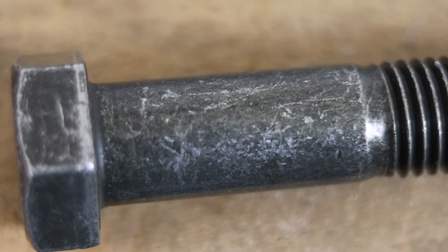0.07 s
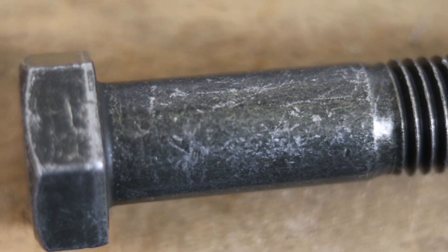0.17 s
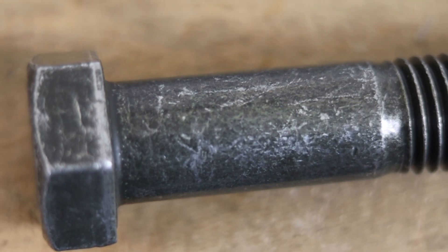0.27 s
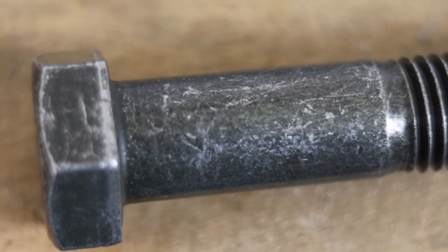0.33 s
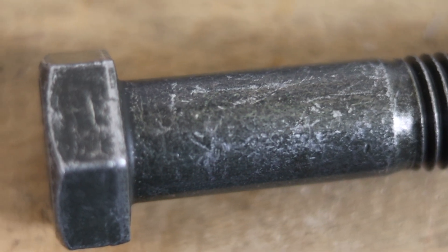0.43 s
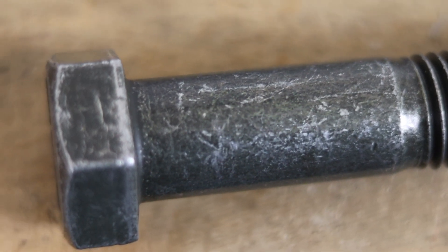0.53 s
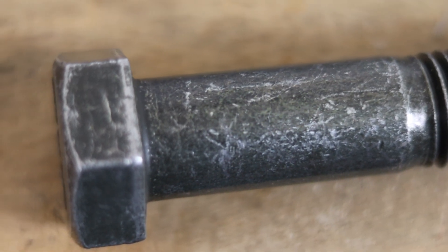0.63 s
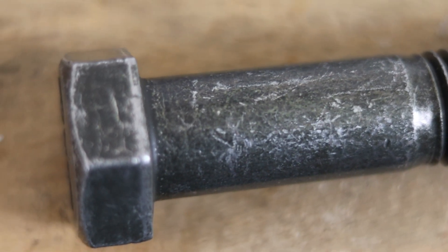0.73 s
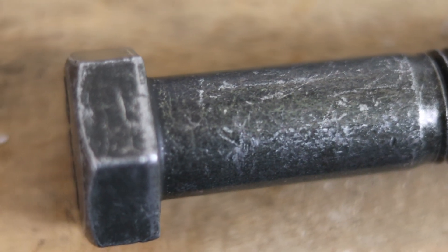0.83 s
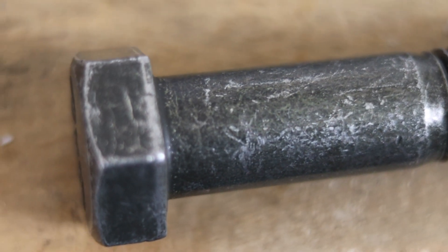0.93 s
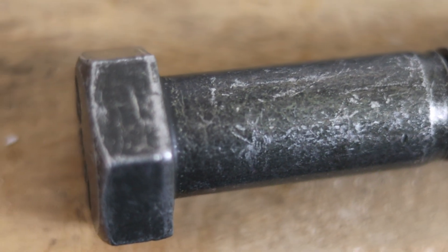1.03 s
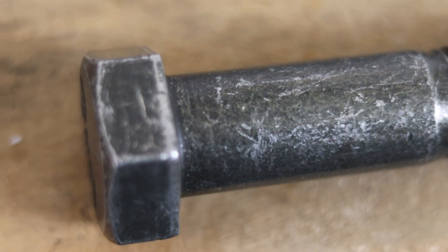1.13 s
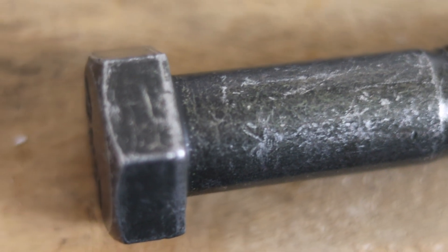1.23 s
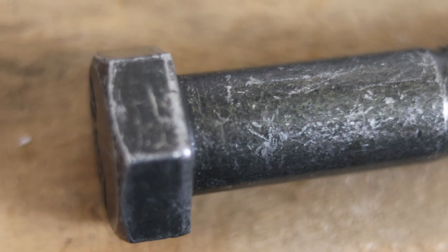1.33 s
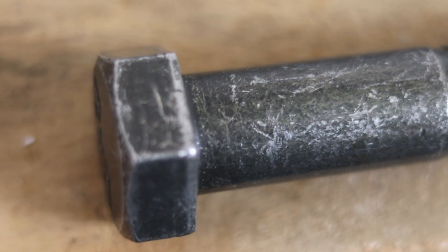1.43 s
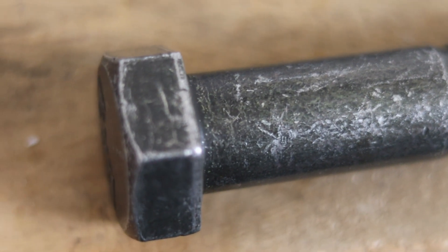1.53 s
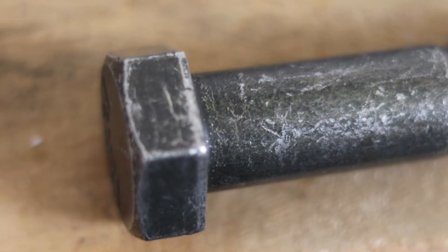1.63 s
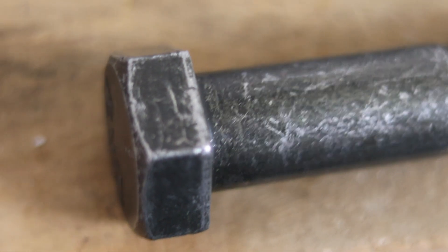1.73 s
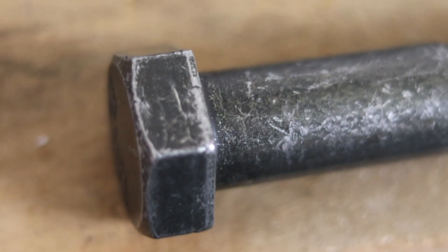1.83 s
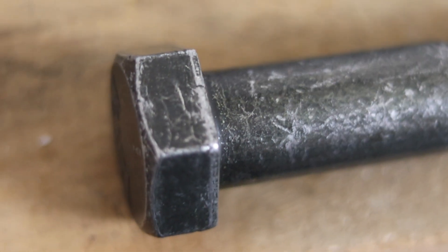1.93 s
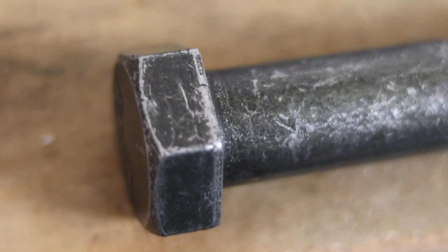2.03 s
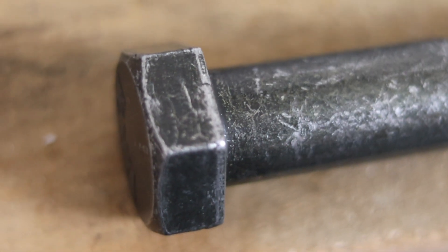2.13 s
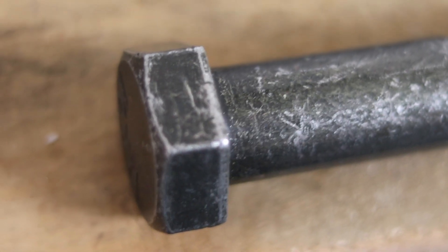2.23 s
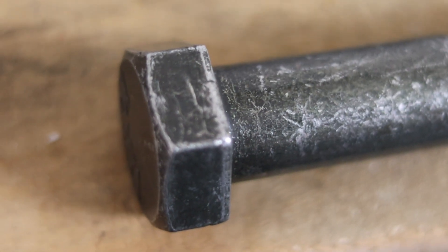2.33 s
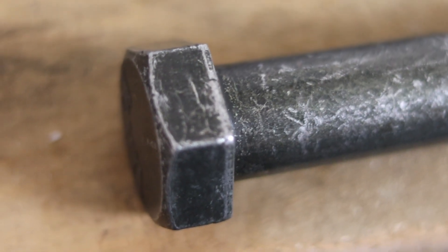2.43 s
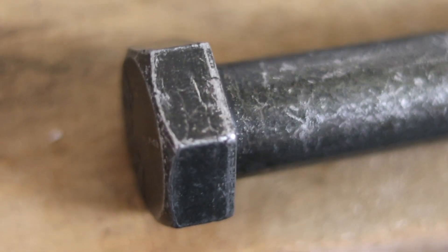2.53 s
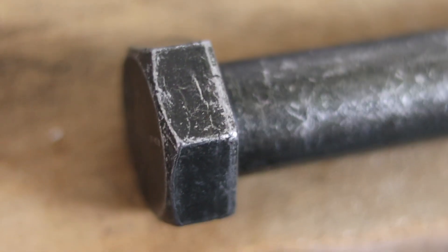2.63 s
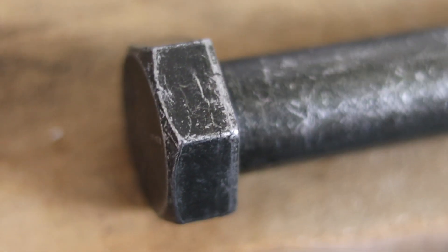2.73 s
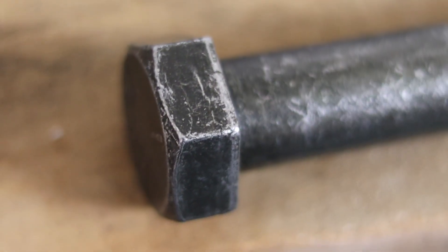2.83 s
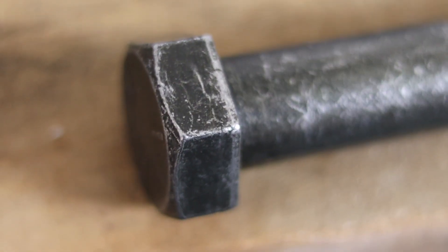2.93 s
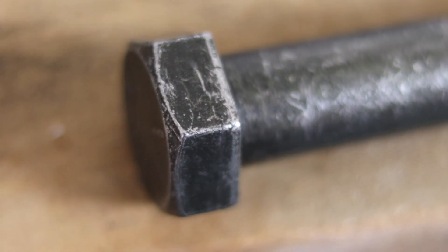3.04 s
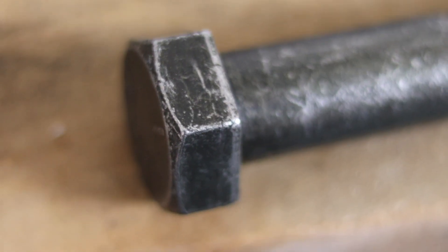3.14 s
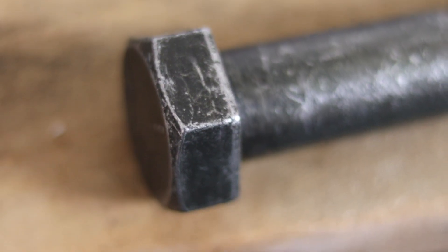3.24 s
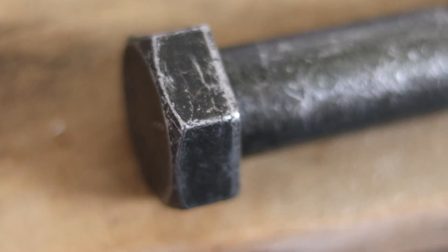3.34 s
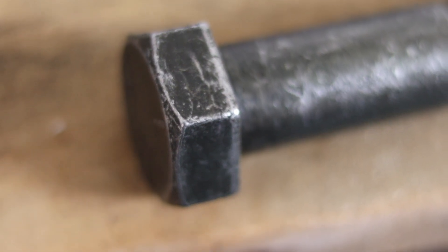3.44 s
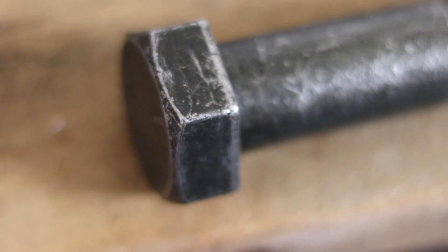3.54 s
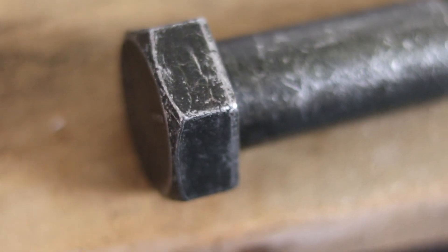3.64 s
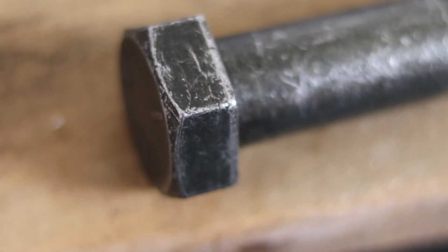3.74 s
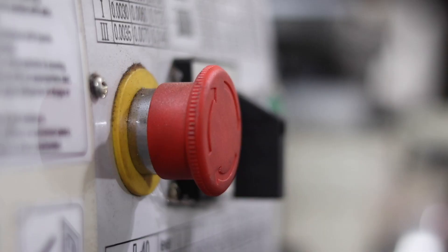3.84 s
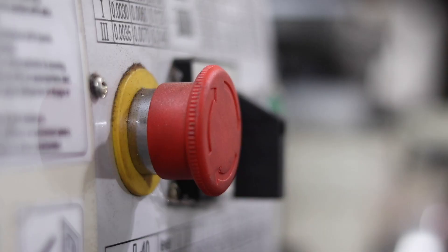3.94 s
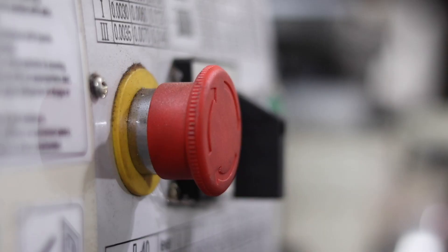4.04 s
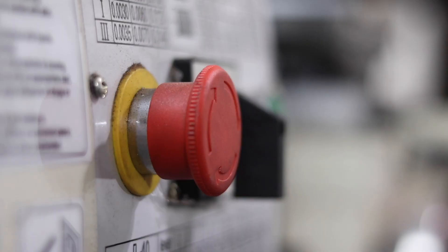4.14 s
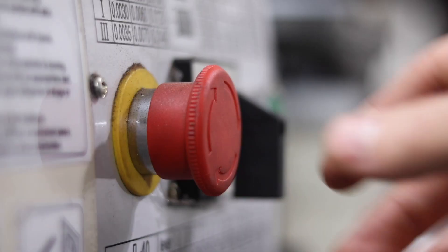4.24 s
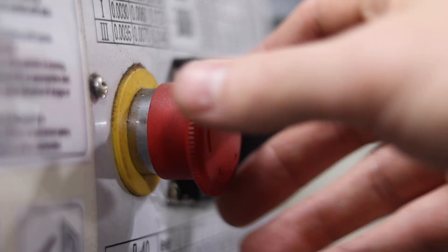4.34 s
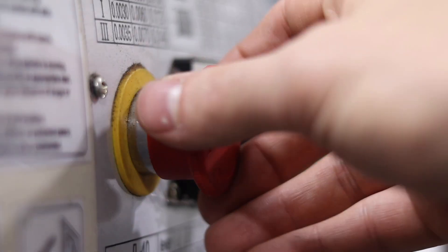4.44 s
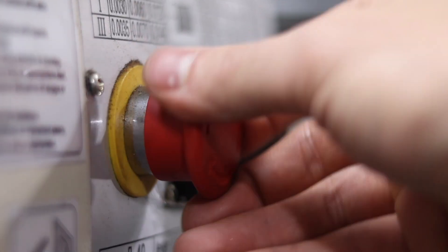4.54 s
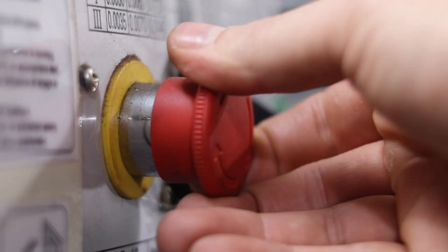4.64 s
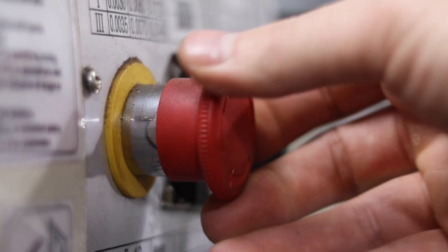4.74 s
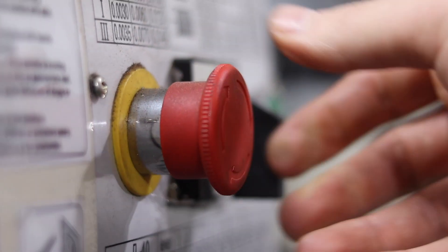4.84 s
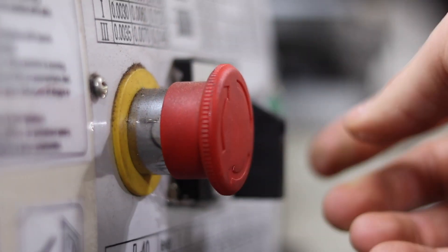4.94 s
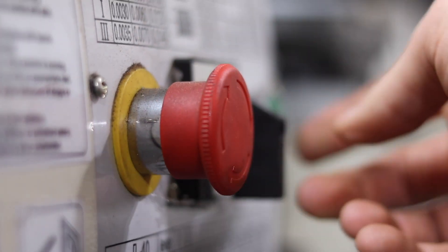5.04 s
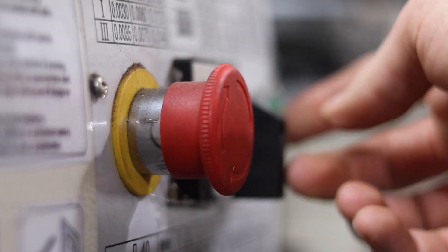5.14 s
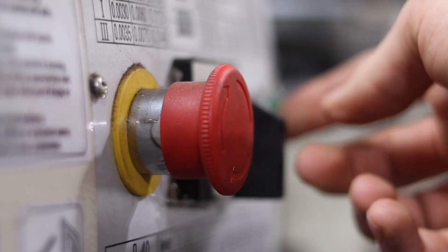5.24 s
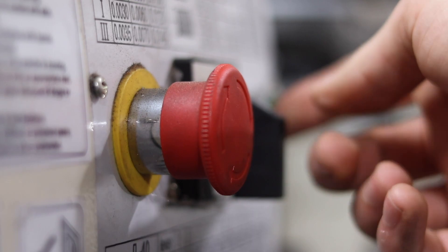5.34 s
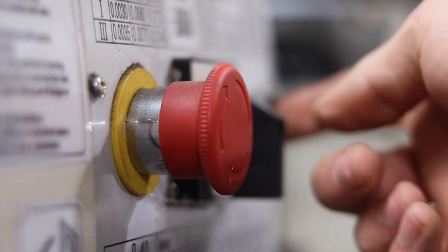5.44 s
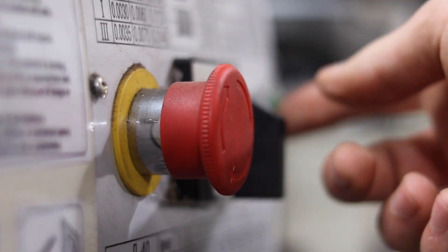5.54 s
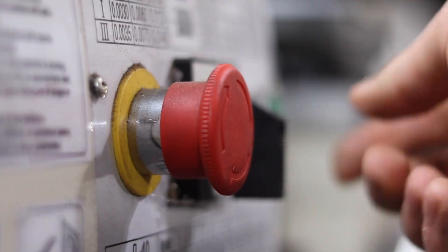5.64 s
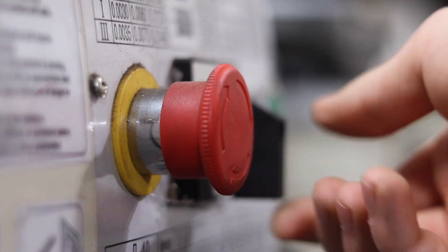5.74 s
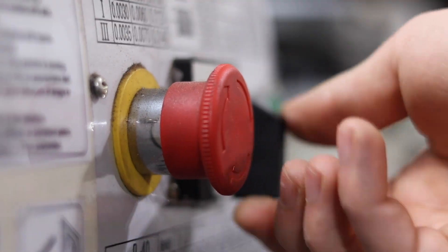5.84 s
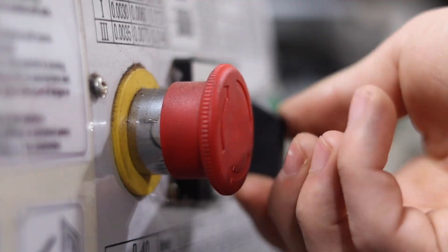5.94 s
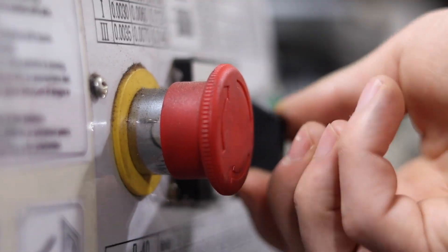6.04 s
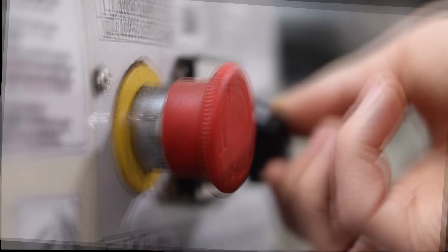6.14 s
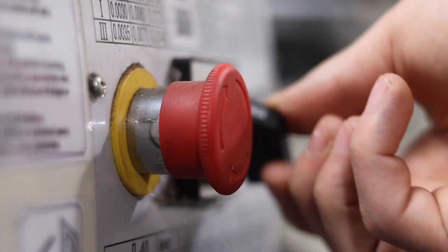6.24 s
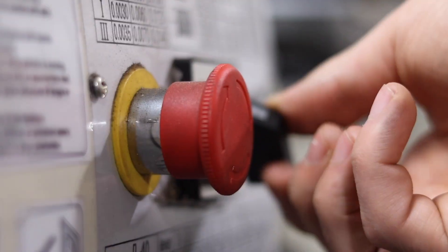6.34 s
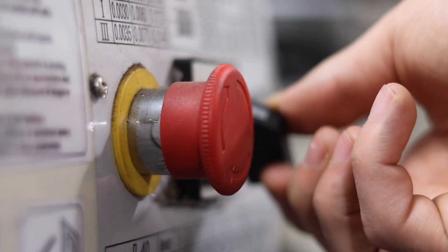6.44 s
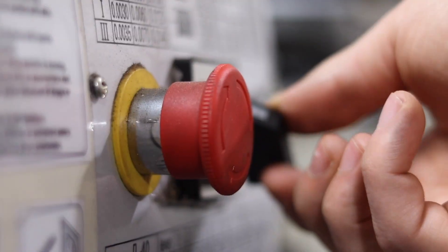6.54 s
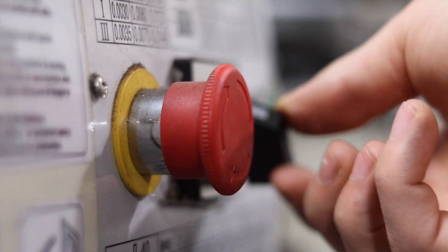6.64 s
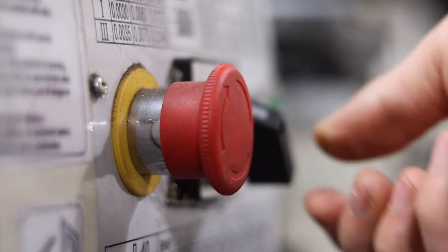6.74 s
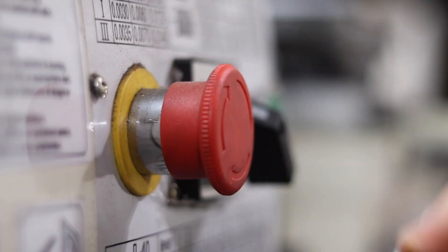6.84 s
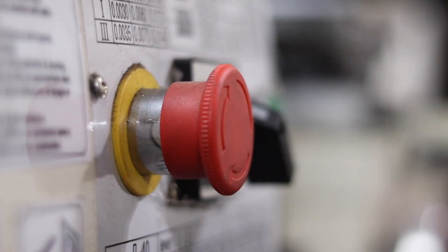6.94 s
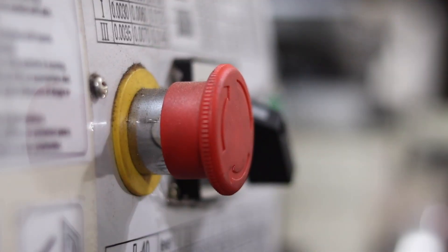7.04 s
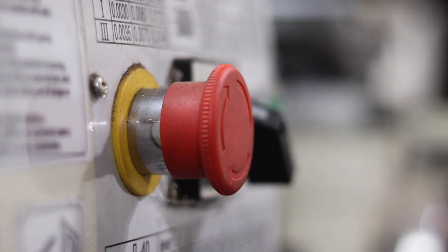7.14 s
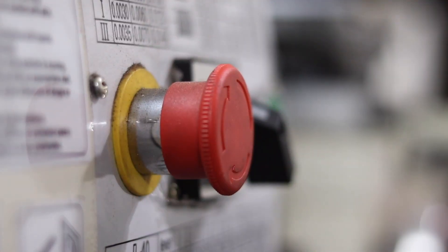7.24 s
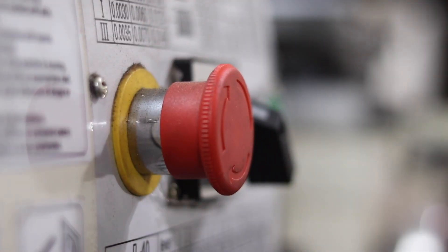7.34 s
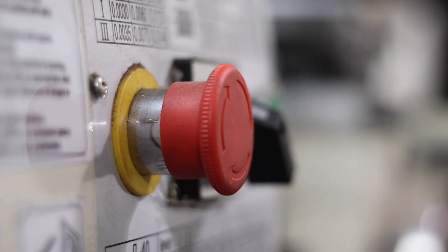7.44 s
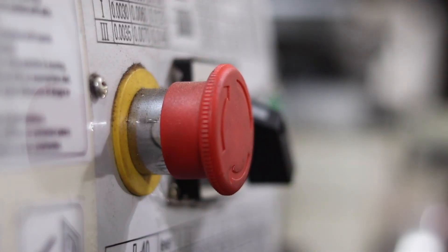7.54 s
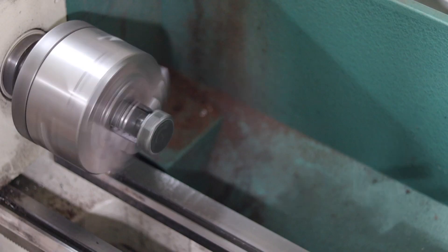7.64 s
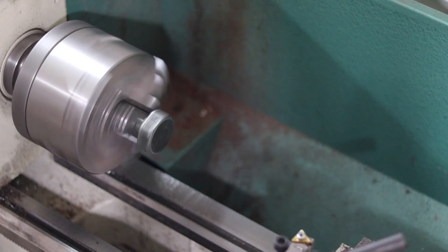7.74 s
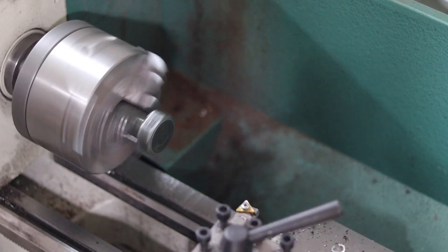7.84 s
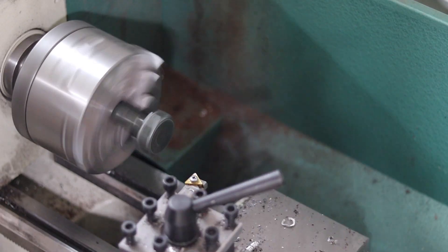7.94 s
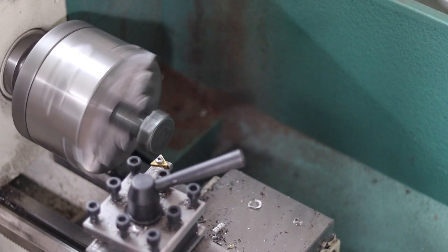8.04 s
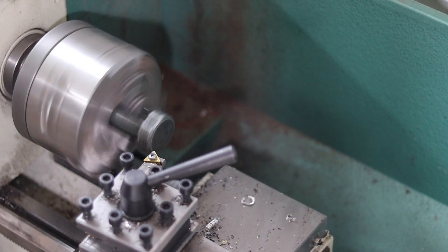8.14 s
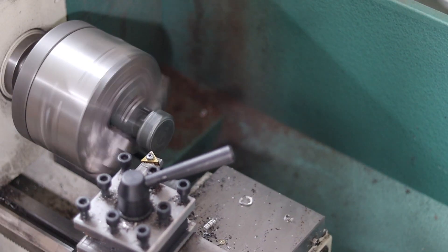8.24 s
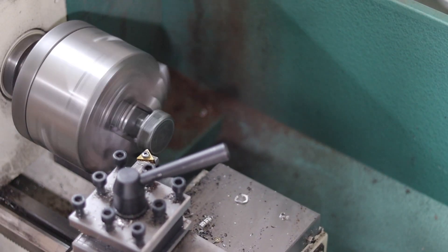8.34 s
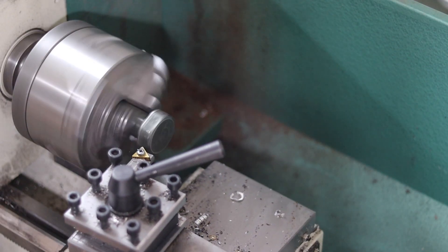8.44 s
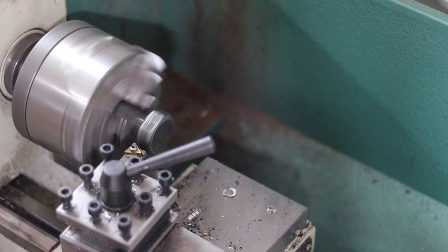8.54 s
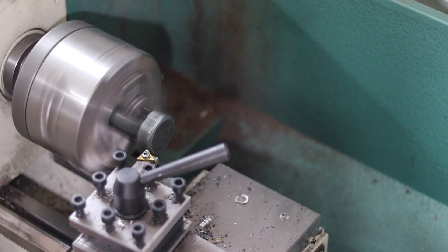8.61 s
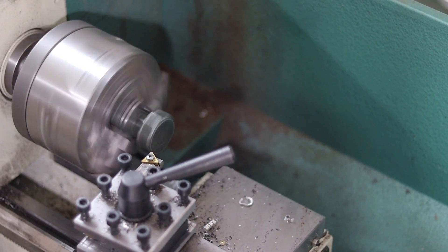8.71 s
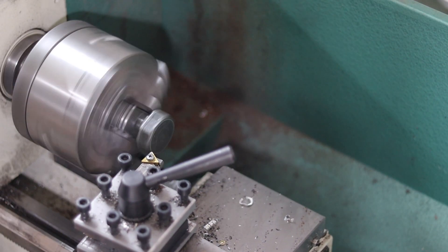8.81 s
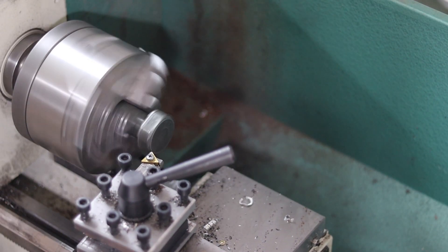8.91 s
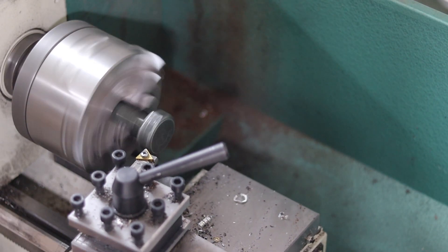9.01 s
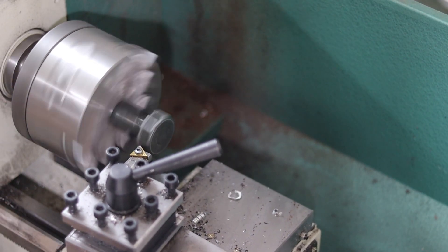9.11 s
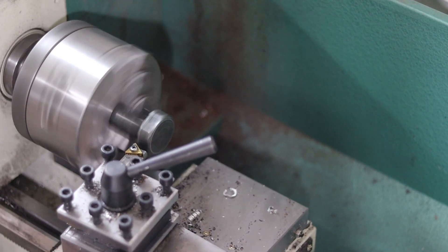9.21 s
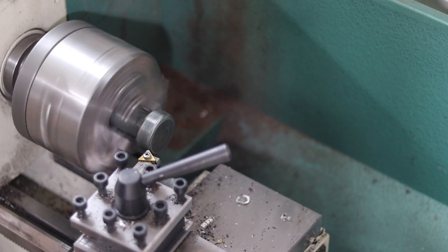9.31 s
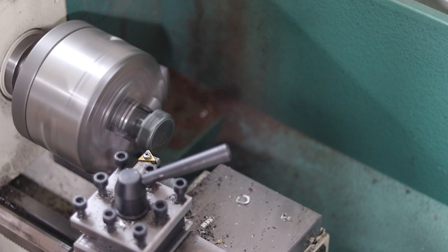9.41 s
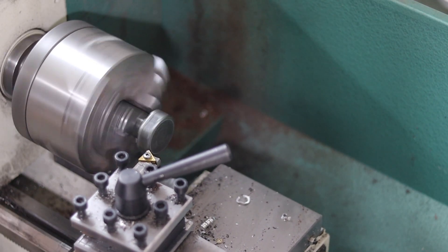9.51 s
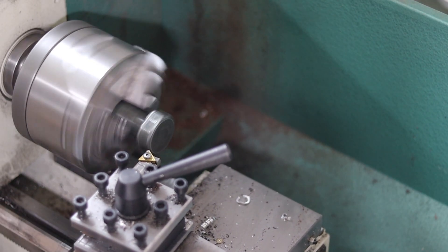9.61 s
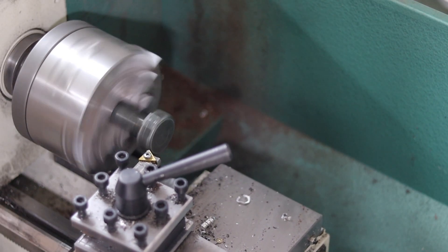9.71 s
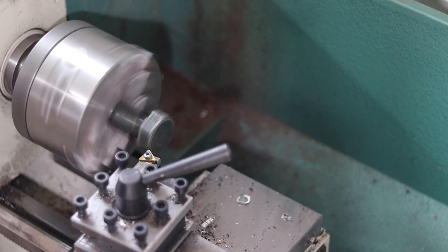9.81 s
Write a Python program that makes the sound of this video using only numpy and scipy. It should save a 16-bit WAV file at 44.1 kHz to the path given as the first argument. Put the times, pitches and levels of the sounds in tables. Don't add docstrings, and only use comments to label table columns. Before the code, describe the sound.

Low workshop hum with faint ticks drops to near silence, then a stop button clicks, a contactor clacks, and a lathe spins up to a steady whine.

```python
import sys
import numpy as np
from scipy import signal
from scipy.fft import rfft, irfft, next_fast_len
from scipy.io import wavfile
from scipy.ndimage import uniform_filter1d

SR = 44100
rng = np.random.default_rng(int(sys.argv[2]) if len(sys.argv) > 2 else 0)


def to_wav(s):
    ch = np.atleast_2d(s).T
    pcm = np.round(np.clip(ch, -1, 1) * 32767)
    wavfile.write(sys.argv[1], SR, pcm.astype(np.int16))


def field_ratio(decibels):
    return 10 ** (np.asarray(decibels, dtype=float) / 20)


N = 435282
T = np.arange(N) / SR

HUM_END_S, START_S, FAR_S = 3.876, 6.2, 7.642
TEETH = 48
TURN_HZ = 357.9 / TEETH
MAINS_HUM_HZ = 120.0

# cycles per spindle turn, level/dB
GEAR_ORDERS = [(44, -41.0), (47, -40.0), (48, -18.0), (49, -35.0), (87, -39.0), (90, -31.0), (91, -31.0),
               (92, -33.0), (93, -36.0), (94, -34.0), (95, -37.0), (96, -24.0), (97, -36.0), (99, -34.0),
               (100, -35.0), (101, -37.0), (103, -38.0), (104, -41.0), (105, -40.0), (144, -42.0),
               (145, -48.0), (148, -51.0), (190, -52.0), (191, -53.0), (192, -52.0), (193, -50.0),
               (196, -51.0), (197, -50.0), (200, -54.0), (240, -54.0)]
# f/Hz, width/Hz, level/dB
HEADSTOCK_PEAKS = [(696, 72, 0.5), (1110, 9.1, -30), (1328, 16, -14.5), (1770, 94, -30), (2156, 36, -14),
                   (2826, 9.9, -10.5), (3330, 65, -26), (3980, 27, -29)]
# f/Hz, level/dB
PLASTIC_COLOUR = [(250, -41.5), (700, -4.5), (1250, -4), (1800, 0), (2400, -9.5), (3600, -8), (5000, -15.5),
                  (7000, -32), (12000, -54)]
# f/Hz, level/dB, time to fall 60 dB/s
PANEL_MODES = [(920, -22, .15), (1308, -14, .12), (1567, -9, .12), (1760, -10, .12), (2116, -17, .1),
               (3435, -10, .08)]
# f/Hz, width/Hz, level/dB
CABINET_THUD = [(198, 46, 22.9), (399, 430, 9.7)]


def level(x, db):
    return x * field_ratio(db) / np.sqrt(np.mean(x ** 2))


def read(table, hz):
    table_hz, values = np.array(table)[:, 0], np.array(table)[:, 1]
    return np.interp(np.log(hz + 1), np.log(table_hz + 1), values)


def colour(x, table):
    size = next_fast_len(len(x))
    gain = field_ratio(read(table, np.fft.rfftfreq(size, 1 / SR)))
    return irfft(rfft(x, size) * gain, size)[:len(x)]


def resonate(x, peaks):
    return sum(field_ratio(db) * signal.lfilter(*signal.iirpeak(hz, hz / width, SR), x) for hz, width, db in peaks)


def ring(x, modes):
    out = 0
    for hz, db, t60 in modes:
        pole = np.exp((2j * np.pi * hz - np.log(1000) / t60) / SR)
        out = out + field_ratio(db) * signal.lfilter([1], [1, -pole], x).imag
    return out


def noise():
    return rng.standard_normal(N)


def walk(rate):
    hold = int(SR / rate)
    steps = np.repeat(rng.standard_normal(N // hold + 1), hold)
    return uniform_filter1d(uniform_filter1d(steps, hold), hold)[:N]


def between(t0, t1):
    return np.clip(np.minimum(T - t0, t1 - T) / .004 + .5, 0, 1)


def after(s, fall_s):
    return (T >= s) * np.exp(-np.maximum(T - s, 0) / fall_s)


def room(x):
    # f/Hz, time to fall 60 dB/s
    echo_times = [(150, 1), (600, 0.54), (1800, 0.18), (4000, 0.4), (9000, 0.069), (14000, 0.21)]
    t = T[:SR]
    tail = np.zeros(SR)
    for hz in 125 * 2. ** np.arange(0, 7.1, .5):
        band = signal.lfilter(*signal.iirpeak(hz, 1.4, SR), rng.standard_normal(SR))
        tail += band * field_ratio(-60 * t / read(echo_times, hz))
    tail *= np.clip(t / 0.0094, 0, 1)
    return signal.fftconvolve(x, tail / np.linalg.norm(tail))[:len(x)]


def widen(x, side_table, smear_ms):
    age = T[:int(.005 * smear_ms * SR)]
    smear = rng.standard_normal(SR)[:len(age)] * np.exp(-age * 1000 / smear_ms)
    smeared = signal.fftconvolve(x, smear / np.linalg.norm(smear))[:N]
    side = colour(smeared, side_table)
    return np.array([x + side, x - side])


def knocks(events, body, modes, ring_db, wet_db, low_body, thud_db):
    dull, crack, thud = np.zeros(N), np.zeros(N), np.zeros(N)
    grit = noise()
    for s, db, treble_db, hz, ms in events:
        span = slice(int(s * SR), min(int(s * SR) + SR // 4, N))
        age, length = T[span] - T[span][0], max(ms, .3) / 1000
        attack = np.clip(age / (0.081 * length), 0, 1)
        burst = grit[span] * np.exp(-age / length) * attack * field_ratio(db)
        dull[span] += burst + resonate(burst, [(hz, .3 * hz, 8)])
        crack[span] += burst * field_ratio(treble_db + 5.5) * np.exp(-age / 0.0092)
        thud[span] += burst * field_ratio(thud_db + 5 * np.log2(100 * length))
    busy = slice(int(events[0][0] * SR) - SR // 10, int(events[-1][0] * SR) + SR)
    dry = field_ratio(8.5) * colour(dull[busy], body)
    dry += resonate(crack[busy], [(4700, 2200, -1.5), (8100, 4500, -0.33), (12600, 1400, 0)])
    dry += field_ratio(ring_db) * ring(dull[busy], modes)
    dry += resonate(resonate(thud[busy], low_body), [(298, 1200, 0.0058)])
    out = np.zeros(N)
    out[busy] = dry + field_ratio(wet_db) * room(dry)
    return out


def stop_button():
    # t/s, peak level/dB, treble against it/dB, main f/Hz, rattle length/ms
    button_knocks = [
        (4.384, -48, -8.5, 2800, 35),
        (4.438, -47, -25.5, 1000, 6.1),
        (4.57, -41, -20, 1610, 17),
        (4.592, -34.5, -11, 1990, 23),
        (4.619, -20, -6, 980, 16.5),
        (4.7208, -11.5, -21, 1720, 3.7),
        (4.788, -46, -0.5, 2000, 11),
        (4.8036, -5, -13.5, 2030, 3.5),
        (4.817, -20.5, -33, 1800, 8.9),
    ]
    # f/Hz, level/dB, time to fall 60 dB/s
    door_modes = [(486, -38, .8), (668, -44, 1.5), (790, -46, 1.2), (745, -52, .8)]
    door_s = 4.805
    blow = 1. * (np.arange(N) == int(door_s * SR))
    door = ring(blow, door_modes) * np.clip((T - door_s) / 0.078, 0, 1)
    return knocks(button_knocks, PLASTIC_COLOUR, PANEL_MODES, -33, -8.0, CABINET_THUD, -11.5) + door


def contactor():
    # t/s, peak level/dB, treble against it/dB, main f/Hz, rattle length/ms
    contact_knocks = [
        (5.386, -35, -34, 2080, 5.6),
        (5.401, -42, -26, 2100, 21),
        (5.423, -29.5, -12, 3200, 15),
        (5.433, -21, -15, 2690, 11),
        (5.439, -15.5, -8.5, 4100, 10.6),
        (5.462, -20, -6, 2580, 35.3),
        (5.585, -32, -15.5, 2870, 18),
        (5.604, -26, -16, 2060, 5),
        (5.612, -22.5, -16.5, 2070, 5.7),
    ]
    # f/Hz, level/dB
    steel_colour = [(300, -6.5), (600, -19.5), (1220, -1), (1500, -10.5), (2800, -12.5), (4300, -12),
                    (6000, -19), (8000, -20), (12000, -55)]
    # f/Hz, level/dB, time to fall 60 dB/s
    box_modes = [(1200, -10, 0.13), (1947, -3, 0.1), (2500, -15, 0.068), (2760, -5, 0.07),
                 (3380, -14, 0.083), (4070, -17, .06), (4285, -4, 0.054), (5846, -22, 0.11),
                 (7400, -22.5, 0.12)]
    return knocks(contact_knocks, steel_colour, box_modes, -37.5, -6, CABINET_THUD, -14)


def start_switch():
    # t/s, peak level/dB, treble against it/dB, main f/Hz, rattle length/ms
    switch_knocks = [
        (6.159, -51, -23, 1600, 8),
        (6.18, -32, -18, 1770, 21),
        (6.199, -2, -6.5, 1070, 3.6),
        (6.205, -19, -6, 2060, 7.3),
        (6.305, -31.5, 5.5, 1450, 27.6),
    ]
    return knocks(switch_knocks, PLASTIC_COLOUR, PANEL_MODES, -51.5, -9.0, CABINET_THUD, -19)


def run_up():
    spin_s, pull_per_s, ease = 6.172, 3.95, 22
    pull = np.maximum(T - spin_s, 0) * pull_per_s
    speed = pull / (1 + pull ** ease) ** (1 / ease)

    peak_s, rise_s, hold_s, fall_s = 6.31, 0.067, 0.057, 0.069
    settle_share, settle_s = 0.25, .3
    free_s = peak_s + hold_s
    rising = np.exp(-(np.minimum(T - peak_s, 0) / rise_s) ** 2)
    falling = (1 - settle_share) * after(free_s, fall_s) + settle_share * after(free_s, settle_s)
    strain = np.where(T < free_s, rising, falling)

    whine_db = 0.15 + np.maximum(-260 * (1 - speed), -34)
    growl_gain = field_ratio(-36.5) * speed + field_ratio(-17) * strain
    hiss_db = -28 - 12 * np.clip(2 * (1 - speed / 0.63), 0, 1) + 4.5 * strain
    return speed, strain, whine_db, growl_gain, hiss_db


def tooth_phases():
    return .4 * (rng.random(len(GEAR_ORDERS)) - .5)


def whine(t, turns, hum_hz, change, phases):
    iron_levels = [-39.5, -37]
    gears, iron = 0, 0
    for (order, db), phase in zip(GEAR_ORDERS, phases):
        gears = gears + field_ratio(db + read(change, order * TURN_HZ)) * np.sin(2 * np.pi * (order * turns + phase))
    for k, db in enumerate(iron_levels, 1):
        iron = iron + field_ratio(db + read(change, k * hum_hz)) * np.sin(2 * np.pi * k * hum_hz * t)
    return np.sqrt(2) * gears, np.sqrt(2) * iron


def growl(turns, speed, casing_peaks):
    # f/Hz, width/Hz, level/dB
    shell_peaks = [(1470, 100, -0.5), (1850, 49, 1), (2200, 120, -9), (2600, 180, -14)]
    teeth = np.diff(np.floor(turns * TEETH), prepend=0) * field_ratio(2.5 * noise())
    knocking = level(resonate(teeth + 0.098 * noise(), casing_peaks), 0)
    slots_per_turn = 2875 / TURN_HZ
    slots = field_ratio(5 * walk(150)) * np.sin(2 * np.pi * (turns * slots_per_turn + .5 * walk(300)))
    slip = np.clip(4 * (1 - speed), 0, 1)
    return knocking + resonate(slots * slip, shell_peaks)


def bearing_hiss(turns):
    # f/Hz, level per Hz/dB
    bearing_colour = [(24, -80), (45, -65), (100, -48), (190, -35), (340, -18), (430, -18), (600, -16.5),
                      (720, -5), (900, -20), (1240, -27), (1700, -27.5), (8600, -42), (10200, -54),
                      (16000, -53.5)]
    throb = field_ratio(1.5 * np.sin(2 * np.pi * 4 * turns) + 2.5 * np.sin(2 * np.pi * 5 * turns))
    return level(colour(noise(), bearing_colour), 0) + throb * level(resonate(noise(), HEADSTOCK_PEAKS), -3.8)


def lathe_near():
    # f/Hz, width/Hz, level/dB
    casing_peaks = [(190.7, 15, 10.5), (242, 11.7, 12), (498, 24, 0), (668, 38, 1), (802, 21, 7.5),
                    (1850, 83, -45)]
    speed, strain, whine_db, growl_gain, hiss_db = run_up()
    turns = np.cumsum(np.clip(speed, 0, 1)) * TURN_HZ / SR
    near = slice(int(START_S * SR), int(FAR_S * SR) + 500)
    angle = turns[near] - turns[int(6.898 * SR)]
    no_change = [(100, 0), (2000, 0)]
    gears, iron = whine(T[near], angle, MAINS_HUM_HZ, no_change, tooth_phases())
    tones = np.zeros(N)
    tones[near] = gears * field_ratio(whine_db[near] + walk(59)[near]) + iron
    tones[near] += field_ratio(0.5) * resonate(gears * strain[near], casing_peaks[:2])
    out = tones + growl(turns, speed, casing_peaks) * growl_gain + bearing_hiss(turns) * field_ratio(hiss_db + 2)
    return out * between(START_S, FAR_S)


def running_far():
    # f/Hz, change/dB
    far_change = [(120, -3), (240, -10), (360, -11.5), (660, -31), (718, -16), (780, -12.5), (1100, -12.5),
                  (1500, -7.5)]
    # f/Hz, level per Hz/dB
    far_colour = [(18, -66), (30, -45), (80, -39), (125, -22.5), (240, -16.5), (290, -15), (370, -7),
                  (430, -15), (600, -16.5), (740, -7.5), (850, -19), (1600, -25.5), (8400, -35),
                  (10200, -45.5), (16000, -51)]
    # t/s, change/dB
    dips = [
        (8.474, -5),
        (8.9, -0.5),
        (9.215, -3),
    ]
    dip_db = sum(db * after(s, 0.19) for s, db in dips)

    far = slice(int(FAR_S * SR) - 500, N)
    piece_s, first_join_s, overlap = .07635, 7.762, .6
    skip_a_s, skip_b_s = .19334, .58791
    place = (T - first_join_s) / piece_s + .5
    piece = np.floor(place)
    fade = np.clip((place % 1 - .5) / overlap + .5, 0, 1)
    phases, tones = tooth_phases(), np.zeros(N)
    for step, share in ((0, 1 - fade), (1, fade)):
        joins = piece + step
        skipped = skip_a_s * np.ceil(joins / 2) + skip_b_s * np.floor(joins / 2)
        t = (T - 7.7 + skipped)[far]
        gears, iron = whine(t, t * 358.9 / TEETH, 120., far_change, phases)
        tones[far] += share[far] * (gears + iron)

    low = level(resonate(noise(), [(70, 90, 0)]), -52.5)
    bumps = 4 * fade * (1 - fade) * low * field_ratio(4.5 * walk(10))
    hiss = level(colour(noise(), far_colour), 8.86) + level(resonate(noise(), HEADSTOCK_PEAKS), 3.7)
    steady = tones * field_ratio(-0.06 + dip_db + 1.8 * walk(6)) + hiss * field_ratio(-43.5 + dip_db + .6 * walk(9))
    return steady + bumps


def carriage_handle():
    # t/s, peak level/dB, treble against it/dB, main f/Hz, rattle length/ms
    handle_knocks = [
        (8.27, -43.5, 2.5, 3200, 25),
        (8.45, -35, -14, 1480, 13),
        (8.518, -35, -25, 1850, 26),
        (8.593, -30, -26, 3140, 7.4),
        (8.815, -40, -9, 2800, 7),
        (9.135, -23, -21, 3400, 14),
        (9.172, -25.5, -29, 3230, 6.7),
        (9.19, -29, -32, 1800, 17),
        (9.28, -37, -17, 3200, 11),
    ]
    # f/Hz, level/dB
    crank_colour = [(900, -16), (1400, -8), (1800, -8), (2300, -13), (3200, -17), (3700, -7.5), (4500, -28),
                    (6000, -38.5)]
    # f/Hz, level/dB, time to fall 60 dB/s
    lever_modes = [(1715, -4, 0.094), (1929, -1.5, 0.13), (3250, 1.5, 0.064), (3750, -16, 0.045)]
    # f/Hz, width/Hz, level/dB
    carriage_peaks = [(393, 90, 29)]
    # t/s, level/dB
    slack_clunks = [
        (8.455, -28.5),
        (9.175, -32),
        (9.736, -34),
    ]
    rattle = knocks(handle_knocks, crank_colour, lever_modes, -36, -17, carriage_peaks, -12)
    push = noise() * sum(field_ratio(db) * after(s, 0.011) for s, db in slack_clunks)
    return rattle + resonate(resonate(push, carriage_peaks), [(298, 1300, 0)])


def still_room():
    # f/Hz, level per Hz/dB
    still_colour = [(15, -42), (25, -34), (38, -15), (59, -7.5), (130, -20), (242, -24), (293, -22),
                    (591, -34.5), (641, -33), (1700, -40.5), (2690, -44), (6210, -47.5), (16000, -54.5)]
    air = level(colour(noise(), still_colour), -47.5)
    drone = level(resonate(noise(), [(51.2, 9.3, 0)]), -53.5)
    return (air + drone) * field_ratio(-15 * between(START_S, 10))


def workshop():
    # f/Hz, level per Hz/dB
    hum_colour = [(15, -44), (30, -14), (76, -18.5), (120, 1), (160, -11), (250, 2.5), (335, -10.5),
                  (520, -11.5), (700, -20), (1100, -30), (1700, -39), (2800, -43.5), (6000, -47),
                  (16000, -53.5)]
    # f/Hz, width/Hz, level/dB
    hum_peaks = [(50.7, 8.8, -3.5), (102, 9.2, -29), (189, 8, -27), (249, 12, -20), (403.3, 12, -6),
                 (496, 26, -6.5), (667, 60, -21.5), (4180, 110, -37), (4570, 24, -33)]
    # t/s, peak level/dB, treble against it/dB, main f/Hz, rattle length/ms
    small_ticks = [
        (1.793, -35.5, -12, 1290, 3.5),
        (1.833, -18.5, -17.5, 1150, 1.37),
        (2.099, -42, -24, 2100, 1.9),
        (2.465, -44, -24, 2100, 3),
        (2.63, -47.5, -24, 2010, 3),
        (3.506, -45, -24, 2200, 2.7),
    ]
    air = level(colour(noise(), hum_colour), -37) + level(resonate(noise(), hum_peaks), -46.5)
    mains = field_ratio(-40.0) * np.sin(2 * np.pi * MAINS_HUM_HZ * T)
    ticks = knocks(small_ticks, PLASTIC_COLOUR, PANEL_MODES, -62, -27, CABINET_THUD, -18)
    return air * field_ratio(0.16 * walk(1.9)) + mains + ticks


def scene():
    # f/Hz, level/dB
    hum_width = [(60, -17), (110, -24), (200, -22), (380, -19), (700, -15), (1290, -6), (2380, -1),
                 (4400, 0), (8120, 2), (15000, 2)]
    far_width = [(60, -44), (110, -53), (200, -36), (380, -30), (700, -25), (1290, -23), (2380, -20),
                 (4400, -15), (8120, -7), (15000, -4)]
    near_width = [(60, -26), (110, -35), (380, -32), (700, -24), (1290, -19), (2380, -16), (4400, -7),
                  (8120, -2), (15000, -1)]
    knock_width = [(100, -26), (1000, -15.5), (2000, -16), (4000, -12), (8000, -3), (13000, -4)]
    hum = widen(workshop(), hum_width, smear_ms=150)
    close = widen(still_room(), hum_width, smear_ms=150)
    close += widen(stop_button() + contactor() + start_switch(), knock_width, smear_ms=4)
    close += widen(lathe_near(), near_width, smear_ms=40) * field_ratio([[.5], [-.5]])
    far = widen(running_far() + carriage_handle(), far_width, smear_ms=60)
    far *= field_ratio([[-.3], [.3]])
    return hum * between(-1, HUM_END_S) + close * between(HUM_END_S, FAR_S) + far * between(FAR_S, 11)


def roll_off(x):
    return signal.sosfilt(signal.butter(12, 16370, fs=SR, output="sos"), x)


def record(dry):
    low_pass = signal.butter(10, 15900, fs=SR, output="sos")
    mix = signal.sosfilt(low_pass, np.clip(dry, -1, 1))
    return roll_off(mix)


dry = scene()
out = record(dry)
to_wav(out)
```